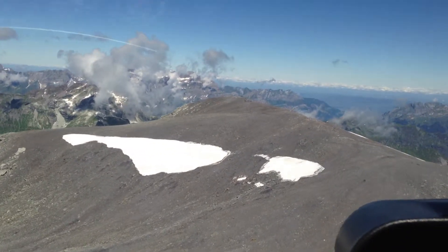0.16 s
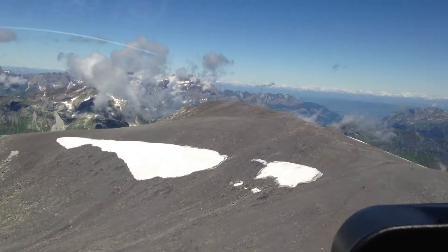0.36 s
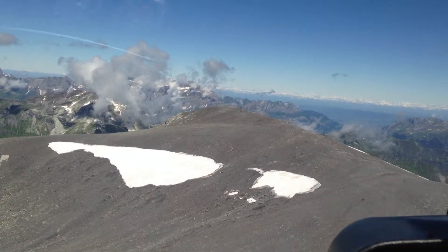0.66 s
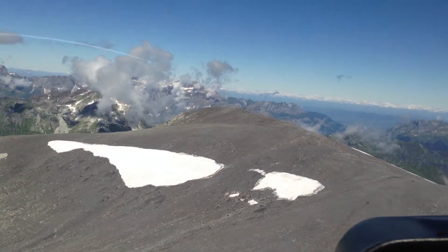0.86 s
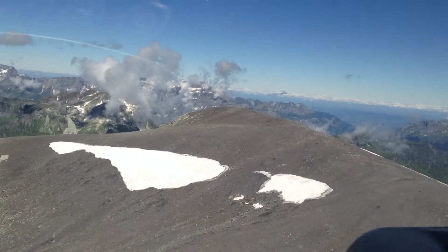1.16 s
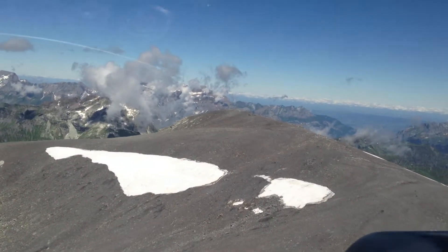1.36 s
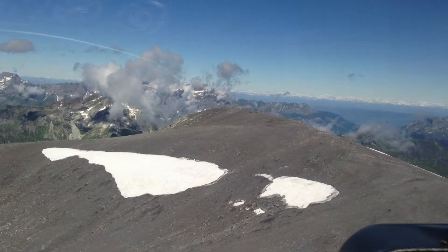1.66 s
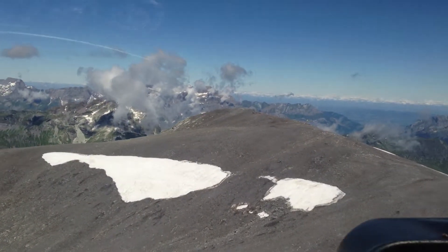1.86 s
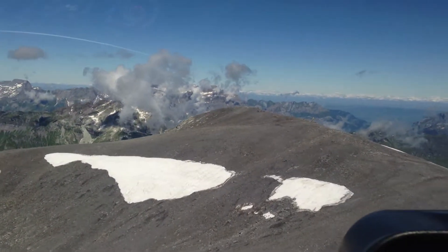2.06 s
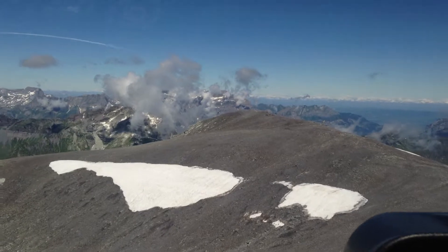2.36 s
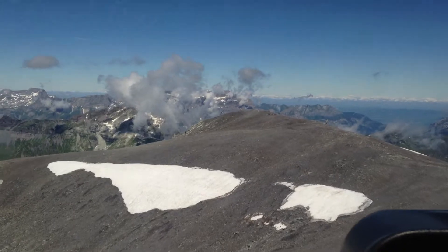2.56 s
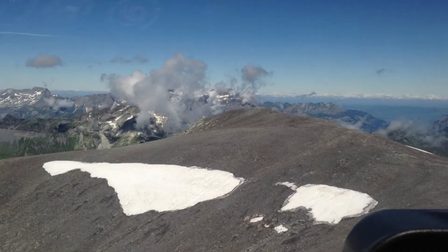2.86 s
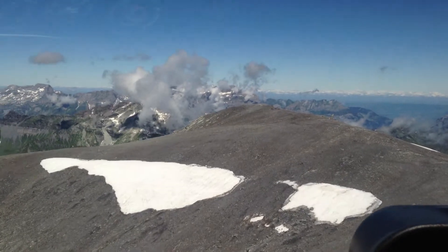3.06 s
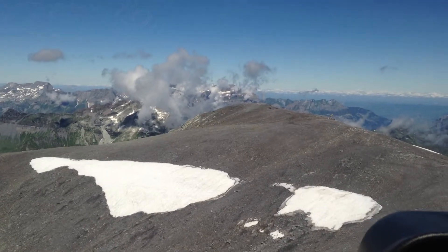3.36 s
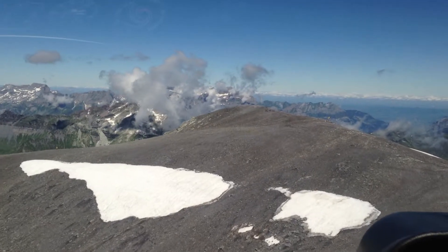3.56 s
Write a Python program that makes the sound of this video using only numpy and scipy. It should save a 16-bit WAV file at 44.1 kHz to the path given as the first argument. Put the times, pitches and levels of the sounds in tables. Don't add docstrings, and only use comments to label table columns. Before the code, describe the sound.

From inside a light helicopter, a steady low engine drone, thin faint whine and roaring, hissing air pulse with the rotor, about fourteen beats a second. Blades slap dully until about 1.1 s, then ease into smoother drone. Slaps return from 1.8 s, hardest and cracking around 2.2-2.4 s as the drone ducks, then fade by 3.1 s while the drone recovers, continuing to 3.7 s. Soft wind bumps touch the microphone.

```python
import sys
import numpy as np
from scipy import signal
from scipy.io import wavfile

SR = 44100
rng = np.random.default_rng(int(sys.argv[2]) if len(sys.argv) > 2 else 0)


def undo_db(level):
    steps = np.asarray(level, float) / 20
    return 10 ** steps


def transcribe(u):
    v = np.clip(np.atleast_2d(u).T, -1, 1)
    q = np.round(v * 32767).astype(np.int16)
    wavfile.write(sys.argv[1], SR, q)


N = 164493

# (time [s], rate [Hz])
FIRING = [(0, 135.9), (.9, 136.2), (1.2, 136.4), (2.0, 136.3), (2.3, 136.7), (2.7, 136.9), (3.1, 136.6),
          (3.73, 136.3)]
# (time [s], gain [dB], exhaust note [dB], other orders [dB], roar [dB])
MIX_RIDE = [(0, -4.5, -17, -2, 0), (.3, -2.5, -17, 0.5, 0.5), (.7, -1.5, -16.5, -0.3, 1.2),
            (.95, -0.5, -18, 0.5, -1.2), (1.1, 0, -18, 0.4, -1.6), (1.5, 0, -17, 0, -1.5),
            (1.75, 0.6, -16, -2.5, -0.9), (1.9, .5, -17.5, 1, -1.5), (2.15, 0, -19.5, 0.3, 1.3),
            (2.21, -3.5, -19, -4.5, -1), (2.25, -6, -19.5, .1, 1.5), (2.4, -8, -20.5, -7.5, 1),
            (2.5, -7, -20.5, -0.5, 1), (2.7, -4, -20.5, -0.2, -1), (3.0, -2.5, -20, -1.5, -1),
            (3.3, -2.5, -16, 0, -1), (3.55, -1.5, -15.5, 2, -0.3), (3.73, -0.5, -17, -2.3, -0.5)]
# (cycles per two crank turns, level against the firing note [dB], flutter [dB])
ENGINE_ORDERS = [(7, -16.5, 5), (8, -6.5, 2.64), (9, -13, 6.5), (10, -7.5, 2), (11, -14.5, -1.8),
                 (12, -11, -0.2), (13, -27.5, 3), (16, -22.5, 4.5), (17, -13, 0.25), (18, -25, 3),
                 (27, -30.5, -2), (35.7, -39, 5.5), (48, -27.5, .6), (51, -33.5, 4.5), (53.7, -31.5, 1.5),
                 (56, -34.5, 3), (68.5, -42.5, -7.5), (83.5, -61, 2.5)]
# (frequency [Hz], level [dB])
GEAR_WHINES = [(4516, -73), (5132, -83), (5337, -64), (6774, -83), (8211, -76), (8500, -79), (8621, -101)]
# (frequency [Hz], level [dB], t60 [s])
AIRFRAME = [(407.4, -37.5, 0.18), (630, -42, 0.28), (1135, -43.5, 0.0093), (2360, -52.5, 0.0045)]
# (frequency [Hz], density [dB per Hz])
ROAR = [(30, -51), (100, -10), (150, 0), (230, -0.8), (420, -8.5), (1200, -21), (1600, -31), (2500, -30.5)]
# (frequency [Hz], density [dB per Hz])
HISS = [(700, -2), (1500, -2), (3000, -3.5), (5000, -9), (7500, -13), (9500, -21), (12000, -20),
        (16500, -36)]
# (time [s], push [dB], edge [dB], brightness [dB per octave], crack [dB])
PASSES = [(-.017, -27, -14, 12, -49), (0.057, -7, -10.5, 2.5, -37), (0.131, -10, -13, 3, -31),
          (0.203, -12, -13.5, 2, -35), (.278, -6, -11, 4.5, -42), (.349, -16, -9, 6, -50),
          (0.423, -7.5, -9.5, -4, -55), (.496, -11, -8.5, -2, -52), (0.569, -11, -9, 4, -64),
          (0.646, -23, -8, -1, -38), (.717, -11.5, -7, 7, -50), (.791, -31, -11.5, 4, -45),
          (0.865, -29, -11.5, -5, -49), (0.937, -5.5, -12.5, -4, -50), (1.010, -11, -14, -1, -51),
          (1.083, -15, -26, -3, -36), (1.305, -22, -29, 1, -43), (1.451, -23, -24, -10, -37),
          (1.824, -4, -20, -1, -51), (1.897, -8, -9, -15, -42), (1.971, -8, -6, -15, -43),
          (2.044, -6, -6.5, -3, -56), (2.118, -13, -4, -10, -54), (2.191, -3.5, -10.5, 2, -36),
          (2.268, -1, -7.5, 7.5, -22.5), (2.341, -2.5, -12, 8, -21), (2.41, -4.5, -9.5, 2, -44),
          (2.483, -5.5, -11.5, 7, -42), (2.557, -5, -15, 4, -52), (2.629, -12, -16, 5.5, -39),
          (2.703, -15, -13.5, -1, -44), (2.777, -10, -11.5, 3, -46), (2.849, -9, -11, 1.5, -53),
          (2.922, -12, -11, -4, -51), (2.996, -8, -12, 0.5, -52), (3.071, -13, -23, -1, -39),
          (3.366, -11, -33, -.7, -39.5), (3.805, -18, -28, 0.1, -45)]
# (delay [ms], low push [dB], sharp edge [dB], crack [dB])
VORTICES = [
    (-17, -11.5, -33, -48),
    (-12, -5, -40, -40),
    (-7.5, 0.2, -13, -26),
    (-2, 1, 1, -10.5),
    (0.68, -25, 0, -2.5),
    (2.5, -3, -4, -0.6),
    (7, -6.5, -4, -16),
    (10.5, -10.5, -4.5, -12),
    (13, -8.5, -5, -13.5),
]
# (frequency [Hz], level [dB], t60 [s])
CABIN = [(281, 0.5, 0.06), (434, -0.5, 0.038), (502, -0.5, 0.041), (554, 0, 0.044), (632, -2.5, 0.035),
         (703, -5, 0.038), (802, -2.5, 0.031), (972, -7, 0.022), (1150, -11.5, 0.012)]
# (frequency [Hz], level [dB], t60 [s])
PANELS = [(1140, 8.5, 0.025), (1450, 6.5, 0.0078), (1570, 3, 0.025), (1796, 3, 0.016), (1920, -3.5, 0.02)]
# (time [s], level [dB], sign of pressure)
BUFFETS = [(.004, -13.5, 1), (0.111, -17, -1), (.262, -18, 1), (.67, -17, 1), (1.198, -20, 1),
           (1.235, -20, 1), (1.334, -16, 1), (1.894, -14, 1), (2.197, -22, 1), (3.335, -18, 1),
           (3.436, -16, 1), (3.695, -16, 1)]

PASS_S = 0.0735
LEAD_S = 0.1
SCATTER_DB = 1.3


def rms_one(x):
    return x / np.sqrt(np.mean(x ** 2) + 1e-20)


def in_time(rows):
    s, *columns = np.transpose(rows)
    return [np.interp(np.arange(N) / SR, s, column) for column in columns]


def drift(rate):
    r = np.exp(-80 * np.pi * rate / SR)
    slow = signal.lfilter([1], [1, -2 * r, r * r], rng.standard_normal(N // 40 + 2002))[2000:]
    return np.interp(np.arange(N) / 40, np.arange(len(slow)), rms_one(slow - slow.mean()))


def ring(drive, hz, t60):
    r = undo_db(-60 / (t60 * SR))
    w = 2 * np.pi * hz / SR
    return signal.lfilter([0, np.sin(w)], [1, -2 * r * np.cos(w), r * r], drive + 1e-18)


def band(order, low_hz, high_hz):
    return signal.butter(order, [low_hz, high_hz], "band", fs=SR, output="sos")


def highpass(order, hz):
    return signal.butter(order, hz, "high", fs=SR, output="sos")


def lowpass(order, hz):
    return signal.butter(order, hz, fs=SR, output="sos")


def pass_numbers():
    s = np.array(PASSES)[:, 0]
    return np.concatenate([[0], np.cumsum(np.round(np.diff(s) / PASS_S))])


def engine(note_db, orders_db):
    cycle = 2 * np.pi * np.cumsum(in_time(FIRING)[0]) / SR / 6
    out = undo_db(note_db + 0.5 * drift(11.0)) * np.sin(6 * cycle + 0.91 + 0.11 * drift(41.0))
    for order, db, flutter_db in ENGINE_ORDERS:
        wobble = 0.012 * order * drift(3.9) + 2 * np.pi * rng.random()
        level_db = note_db.mean() + orders_db + db + flutter_db * drift(3.7)
        out += undo_db(level_db) * np.sin(np.round(order) * cycle + wobble)
    return np.sqrt(2) * out


def gears():
    t = np.arange(N) / SR
    out = np.zeros(N)
    for hz, db in GEAR_WHINES:
        level = np.sqrt(2) * undo_db(db + 1.5 * drift(3.0))
        out += level * np.sin(2 * np.pi * hz * t + 0.44 * drift(2.5))
    return out


def airframe():
    return sum(undo_db(db) * rms_one(ring(rng.standard_normal(N), hz, t60)) for hz, db, t60 in AIRFRAME)


def airflow(spectrum, patchy_db, swish_db, swish_db_per_octave):
    lag, skew, lag_per_octave = 0.28, 0.33, 0.018
    passes = np.interp(np.arange(N) / SR, np.array(PASSES)[:, 0], pass_numbers())
    turn = 2 * np.pi * (passes - lag)
    together = drift(26.0)
    hz_points, db_points = np.transpose(spectrum)
    octaves = np.arange(0, np.log2(15300 / hz_points[0]) + 0.3, 1 / 3)
    edges = hz_points[0] * 2 ** octaves
    white = rng.standard_normal((2, N))
    out = np.zeros(N)
    for k, (low, high) in enumerate(zip(edges, edges[1:])):
        hz = np.sqrt(low * high)
        height = np.log2(hz / 4000)
        level_db = np.interp(np.log(hz), np.log(hz_points), db_points, right=-80)
        late = turn - 2 * np.pi * lag_per_octave * height
        swell = np.cos(late + skew * np.cos(late))
        flicker_db = patchy_db * (together + 2.25 * drift(7.4))
        swing_db = flicker_db + (swish_db + swish_db_per_octave * height) * swell
        out += undo_db(level_db + swing_db) * signal.sosfilt(band(2, low, high), white[k % 2])
    return rms_one(out)


def suction_spikes(clicks):
    return -signal.sosfilt(band(1, 450, 1100), signal.lfilter([0.15], [1, -0.85], clicks))


def crack_bursts(clicks):
    burst = signal.lfilter([1], [1, -np.exp(-1 / (0.0018 * SR))], clicks)
    burst = signal.lfilter([1 - np.exp(-1 / (0.00095 * SR))], [1, -np.exp(-1 / (0.00093 * SR))], burst)
    tint = np.vstack([band(1, 900, 2000), lowpass(4, 5500)])
    return 2 * signal.sosfilt(tint, burst * rng.standard_normal(N + SR))


def slaps():
    number = np.arange(pass_numbers()[-1] + 1)
    columns = np.transpose(PASSES)
    s, push, edge, bright, crack = (np.interp(number, pass_numbers(), c)[:, None] for c in columns)
    delay_ms, push_db, edge_db, crack_db = np.transpose(VORTICES)
    chance = rng.standard_normal((len(s), 3 + len(CABIN) + len(PANELS), len(delay_ms)))
    at = ((s + delay_ms / 1000 + 0.00021 * chance[:, 0] + LEAD_S) * SR).astype(int)

    def train(db):
        clicks = np.zeros(N + SR)
        np.add.at(clicks, at, undo_db(db))
        return clicks

    out = ring(train(push + push_db - 7 + 0.77 * chance[:, 1]), hz=210.2, t60=0.051)

    tilt = bright - 0.92 * np.maximum(delay_ms - delay_ms[np.argmax(edge_db)], 0)
    for k, (hz, db, t60) in enumerate(CABIN):
        colour_db = (tilt if hz > 530 else np.maximum(tilt, 0)) * np.log2(hz / 530)
        strike_db = edge + edge_db + db + colour_db - 8.5 + SCATTER_DB * chance[:, 3 + k]
        out += (-1) ** k * ring(train(strike_db), hz, t60)

    for k, (hz, db, t60) in enumerate(PANELS):
        strike_db = crack + 1.02 * crack_db + db - 3 + SCATTER_DB * chance[:, -1 - k]
        out += (-1) ** k * ring(train(strike_db), hz, t60)

    out += suction_spikes(train(edge + edge_db + 22 - 4.5 * np.abs(delay_ms + 0.95)))
    out += crack_bursts(train(crack + crack_db + 8 + SCATTER_DB * chance[:, 2]))
    walls = np.vstack([highpass(4, 140), lowpass(2, 4000)])
    start = int(LEAD_S * SR)
    return signal.sosfilt(walls, out)[start:start + N]


def buffets():
    width_s = 0.002
    t = np.arange(N) / SR
    bumps = np.zeros(N)
    for s, db, sign in BUFFETS:
        bumps += np.sign(sign) * undo_db(db) * np.exp(-0.5 * ((t - s) / width_s) ** 2)
    return signal.sosfilt(highpass(2, 45), bumps)


def scene():
    gain_db, note_db, orders_db, roar_db = in_time(MIX_RIDE)
    roar = undo_db(-24 + roar_db) * airflow(ROAR, patchy_db=0.47, swish_db=3.5, swish_db_per_octave=0.91)
    hiss = undo_db(-40.5) * airflow(HISS, patchy_db=0.5, swish_db=1.38, swish_db_per_octave=0.93)
    steady = undo_db(gain_db) * (engine(note_db, orders_db) + gears() + airframe() + roar + hiss)
    return (steady + slaps() + buffets())[None]


def low_pass(x):
    return signal.sosfilt(signal.butter(12, 15330, fs=SR, output="sos"), x)


def record(dry):
    thin = signal.sosfilt(highpass(2, 54), dry)
    held = 0.73 * np.tanh((np.abs(thin) / 0.68) ** 3.007) ** (1 / 2.974) * np.sign(thin)
    mix = signal.sosfilt(signal.cheby2(16, 60, 15650, fs=SR, output="sos"), held)
    return low_pass(mix)


dry = scene()
out = record(dry)
transcribe(out)
```